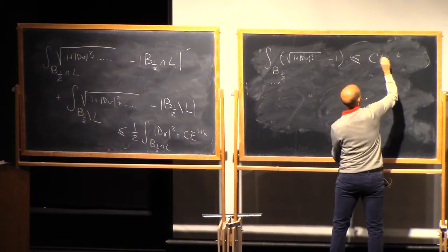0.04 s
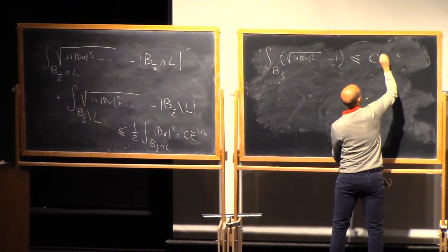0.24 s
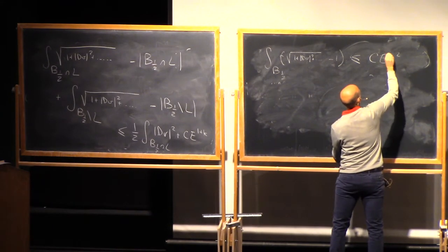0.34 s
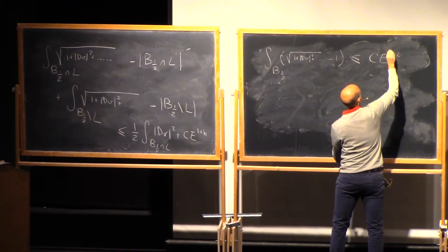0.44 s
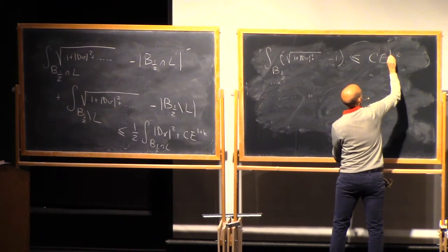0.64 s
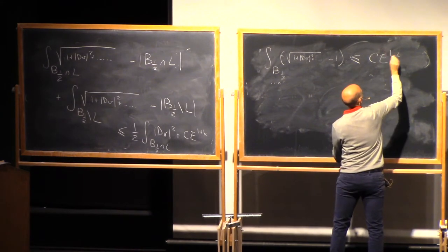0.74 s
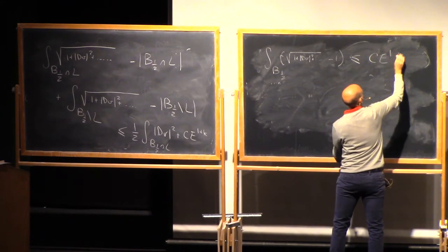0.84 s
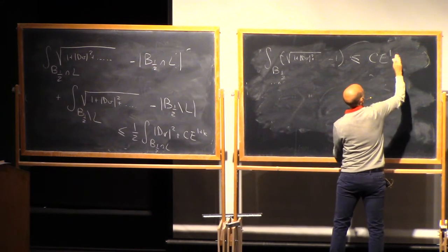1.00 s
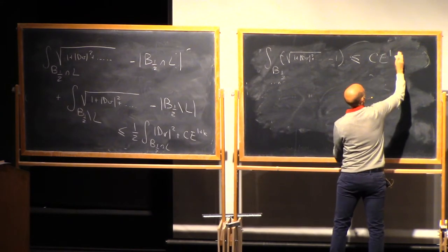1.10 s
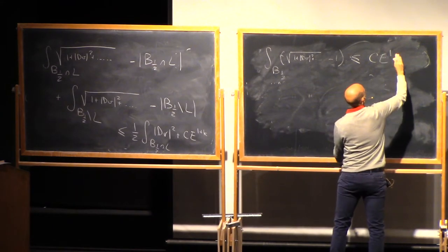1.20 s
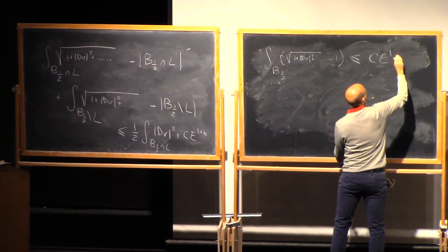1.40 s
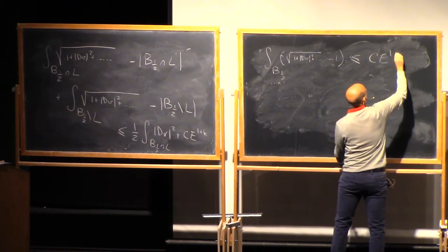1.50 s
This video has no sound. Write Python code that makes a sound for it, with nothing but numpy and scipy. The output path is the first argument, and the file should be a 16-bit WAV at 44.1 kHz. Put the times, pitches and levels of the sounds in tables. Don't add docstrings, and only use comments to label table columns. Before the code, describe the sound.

Chalk knocks and scrapes on a blackboard, two sharp taps standing out in a quiet lecture hall.

```python
import sys
import numpy as np
from scipy import signal
from scipy.io import wavfile

SR = 44100
rng = np.random.default_rng(int(sys.argv[2]) if len(sys.argv) > 2 else 0)


def volts_from_db(level):
    exponent = np.asarray(level, float) / 20
    return 10 ** exponent


def to_wav(s):
    ch = np.atleast_2d(s).T
    pcm = np.round(np.clip(ch, -1, 1) * 32767)
    wavfile.write(sys.argv[1], SR, pcm.astype(np.int16))


N = 68355

EDGES_HZ = 25 * 2 ** (np.arange(29) / 3)
BANK = [signal.butter(2, pair, "band", fs=SR, output="sos") for pair in zip(EDGES_HZ, EDGES_HZ[1:])]


def in_time(rows):
    s, value = np.transpose(rows)
    return np.interp(np.arange(N) / SR, s, value)


def at_hz(points, hz, column=1):
    points = np.array(points)
    return np.interp(np.log(hz), np.log(points[:, 0]), points[:, column])


def rms_one(x):
    return x / np.sqrt(np.mean(x ** 2) + 1e-20)


def drift(rate_hz):
    r = np.exp(-2 * np.pi * rate_hz / SR)
    wander = signal.lfilter([1], [1, -2 * r, r * r], rng.standard_normal(N + SR))
    return rms_one(wander[SR:])


def ring(x, hz, t60_s):
    r, w = volts_from_db(-60 / (t60_s * SR)), 2 * np.pi * hz / SR
    return signal.lfilter([0, np.sin(w)], [1, -2 * r * np.cos(w), r * r], x + 1e-18)


def resonance(x, hz, width_hz):
    r = np.exp(-np.pi * width_hz / SR)
    zeros = np.array([1, 0, -1]) * (1 - r * r) / 2
    return signal.lfilter(zeros, [1, -2 * r * np.cos(2 * np.pi * hz / SR), r * r], x)


def rung(x, resonances):
    out = 0
    for k, (hz, width_hz, db) in enumerate(resonances):
        mode = resonance(resonance(x, hz, 1.5 * width_hz), hz, 1.5 * width_hz)
        out = out + (-1) ** k * volts_from_db(db) * mode / np.sqrt(width_hz / SR)
    return out


def bands(count):
    white = rng.standard_normal((2, count))
    return [(EDGES_HZ[k] * 2 ** (1 / 6), signal.sosfilt(sos, white[k % 2])) for k, sos in enumerate(BANK)]


def coloured(spectrum, patchy_db, rate_hz):
    together = drift(rate_hz)
    out = 0
    for hz, band in bands(N):
        flicker_db = patchy_db * (together + drift(rate_hz))
        out = out + volts_from_db(at_hz(spectrum, hz) + flicker_db) * band
    return rms_one(out)


def air():
    # t/s, level/dB
    swell = [(0, 4.5), (.3, 5), (.6, 5.5), (.85, 5), (1, 3.5), (1.2, 3), (1.55, 2.5)]
    # f/Hz, level/dB per Hz
    flow_spectrum = [(30, -12), (60, -4), (110, -2.5), (180, -4.5), (300, -11.5), (550, -13.5),
                     (1000, -22.5), (2500, -33.5)]
    rumble = coloured(flow_spectrum + [(7000, -75)], patchy_db=1.5, rate_hz=10.8)
    duct = rms_one(resonance(rng.standard_normal(N), hz=116, width_hz=18))
    return volts_from_db(in_time(swell)) * (volts_from_db(-56) * rumble + volts_from_db(-60) * duct)


def hiss():
    # f/Hz, level/dB per Hz
    hiss_spectrum = [(1530, -78), (2600, -5.5), (4490, -3.5), (7510, -4.5), (15500, -10)]
    return volts_from_db(-69) * coloured([(500, -12)] + hiss_spectrum, patchy_db=0, rate_hz=6)


def scrape():
    # t/s, level/dB
    drag = [(0, -57.5), (.06, -69), (.12, -64), (.19, -64), (.31, -71), (.36, -65), (.43, -58.5),
            (.47, -62.5), (.6, -68.5), (.69, -65.5), (.76, -66), (.86, -63), (.92, -74), (.96, -80),
            (1.55, -97)]
    # f/Hz, width/Hz, level/dB
    scrape_modes = [(480, 300, -1), (870, 150, -4), (2200, 600, -11), (3600, 600, -13), (1670, 115, 0),
                    (2950, 260, -8), (4700, 450, -14)]
    grit_per_s, grit_spread_db = 2800, -1.5
    sizes = volts_from_db(grit_spread_db * np.minimum(rng.exponential(1, N), 5)) * rng.choice([-1, 1], N)
    catches = rng.random(N) < grit_per_s / SR
    grit = rms_one(sizes * catches) * volts_from_db(0.76 * drift(60))
    return volts_from_db(in_time(drag) - 4) * rung(grit, scrape_modes)


def swish():
    # t/s, level/dB
    speed = [(0, -70), (.08, -70.5), (.1, -76.5), (.5, -74), (.55, -65.5), (.62, -74), (.86, -75),
             (.95, -58), (.99, -61.5), (1.012, -71.5), (1.04, -56), (1.1, -62), (1.125, -58), (1.23, -60.5),
             (1.27, -64), (1.32, -60.5), (1.4, -69.5), (1.45, -76.5)]
    # f/Hz, width/Hz, level/dB
    dust_modes = [(5800, 4600, -4), (9680, 1400, -3.5), (11850, 1900, -2), (15500, 1800, -6)]
    dust = rms_one(rung(rng.standard_normal(N), dust_modes))
    return volts_from_db(in_time(speed) + 0.32 * drift(35)) * dust


def knock(contact_ms, stick_db, crack_db, boom_db, wet_db):
    # f/Hz, level/dB, t60/s
    stick_modes = [(3290, -16, 0.012), (3935, 6, 0.0056), (5160, -4.5, 0.013), (5600, 0, 0.026),
                   (5900, -0.5, 0.0094), (7160, -2, 0.003)]
    # f/Hz, level/dB, t60/s
    panel_modes = [(103, -40, 0.24), (124.5, -8, 0.06), (140, -59, 0.15), (229, -30.5, 0.11),
                   (342, -19.5, 0.035), (512, -41, 0.12), (685, -23, 0.035), (870, -55, 0.067),
                   (1160, -58, .035), (1400, -45, 0.018)]
    # f/Hz, starting level/dB, t60/s
    tail_bands = [(99, -39, 0.1), (248, -35.5, 0.36), (650, -30.5, 0.21), (1350, -29, 0.13),
                  (2640, -21.5, .13), (5400, -25, 0.1), (8350, -26.5, 0.02), (14400, -34, 0.027)]
    # delay/s, level/dB, centre f/Hz, width/Hz
    echoes = [(.0215, -8.5, 3300, 1380), (0.0662, -19.5, 1390, 2200)]
    t = np.arange(SR // 3) / SR
    turn = np.clip(t / (contact_ms / 1000), 0, 1)
    rounded = signal.butter(4, 1750 / contact_ms, fs=SR, output="sos")

    cycle = signal.sosfilt(rounded, np.sin(2 * np.pi * turn) * np.exp(-turn))
    push = np.sin(np.pi * turn) ** 2
    push = push / push.sum()
    click = np.diff(turn > 0, prepend=0) * 1.
    crack_rise_s, crack_fall_s = 0.0001, 0.00069
    crack_shape = np.exp(-t / crack_fall_s) * (1 - np.exp(-t / crack_rise_s))
    crack = volts_from_db(crack_db) * rng.standard_normal(len(t)) * crack_shape

    stick = volts_from_db(stick_db) * signal.sosfilt(rounded, ring(click, hz=1630, t60_s=0.0074))
    stick = stick + sum(ring(crack, hz, t60_s) * volts_from_db(db - 12) for hz, db, t60_s in stick_modes)
    recoil = -volts_from_db(stick_db + 7.5) * ring(push, hz=259, t60_s=0.0075)
    panel_lag_s = 0.0029
    late_push = np.interp(t - panel_lag_s, t, push, left=0)
    panel = sum(volts_from_db(boom_db + db) * ring(late_push, hz, t60_s) for hz, db, t60_s in panel_modes)
    direct = cycle + crack + stick + recoil + panel

    tail = 0
    for hz, band in bands(len(t)):
        fall_db = 60 * t / at_hz(tail_bands, hz, column=2)
        tail = tail + volts_from_db(at_hz(tail_bands, hz) - fall_db) * band
    tail = tail * (1 - np.exp(-t / 0.00033))
    tail_drive = 20 * (push + volts_from_db(crack_db) * click)[:400]
    out = direct + volts_from_db(wet_db) * signal.fftconvolve(tail, tail_drive)[:len(t)]

    for delay_s, db, hz, width_hz in echoes:
        smear = rng.standard_normal(400) * np.exp(-t[:400] / 0.002)
        reflected = resonance(resonance(direct, hz, width_hz), hz, width_hz)
        echo = signal.fftconvolve(reflected, smear / np.linalg.norm(smear))[:len(t)]
        out = out + volts_from_db(db) * np.interp(t - delay_s, t, echo, left=0)
    return out


def taps():
    # t/s, peak level/dB, contact
    # time/ms, stick ring level/dB, crack level/dB
    landings = [(.0035, -34, 1.08, -18, -29.5), (0.1669, -33.5, 1.53, -2.5, -51),
                (.2171, -10.5, 0.78, -17, -27), (0.2529, -42, 0.37, -40, -15.5),
                (.285, -37, 0.72, -8, -24.5), (0.335, -58, 1.9, 13, -36), (.408, -60, 0.37, 8, -21),
                (0.4887, -13, 0.67, -10.5, -32), (.668, -35, 1.34, -2.5, -32), (.685, -38, 1.84, -11, -44),
                (.736, -31.5, 1.8, -39, -48), (.743, -36.5, 1.76, -40, -53), (.775, -36.5, 1.7, -4, -68),
                (0.8082, -40.5, 0.82, -4, -30), (1.074, -37.5, 1.66, -5, -43),
                (1.198, -45.5, 0.92, -45, -35), (1.262, -39.5, 5.1, -37, -45)]
    out = np.zeros(N + SR)
    for s, db, contact_ms, stick_db, crack_db in landings:
        boom_db = 1.09 * (db + 6)
        wet_db = -0.2757 * (db + 19.5)
        sound = volts_from_db(db) * knock(contact_ms, stick_db, crack_db, boom_db, wet_db)
        start = int(s * SR)
        out[start:start + len(sound)] += sound
    return out[:N]


def thuds():
    # t/s, peak level/dB, f/Hz, t60/s
    swings = [
        (0.08, -37, 111, 0.036),
        (0.26, -29, 112, 0.061),
        (.54, -45, 116, 0.57),
        (0.612, -49.5, 111.1, 0.9),
        (.875, -40.5, 143, 0.041),
        (1.096, -33, 123, 0.029),
        (1.26, -41, 125, 0.043),
    ]
    rise_s = 0.003
    out = 0
    for s, db, hz, t60_s in swings:
        t = np.maximum(np.arange(N) / SR - s, 0)
        envelope = volts_from_db(db + 5.5 - 60 * t / t60_s) * (1 - np.exp(-t / rise_s))
        out = out + envelope * np.sin(2 * np.pi * hz * t)
    return out


def scene():
    return (air() + hiss() + scrape() + swish() + taps() + thuds())[None]


def roll_off(x):
    return signal.sosfilt(signal.butter(12, 16420, fs=SR, output="sos"), x)


def record(dry):
    low_cut_hz, top_cut_hz = 62, 15720
    x = signal.sosfilt(signal.butter(2, low_cut_hz, "high", fs=SR, output="sos"), dry)
    x = signal.sosfilt(signal.ellip(10, 0.3, 28, top_cut_hz, fs=SR, output="sos"), x)
    return roll_off(x)


dry = scene()
out = record(dry)
to_wav(out)
```